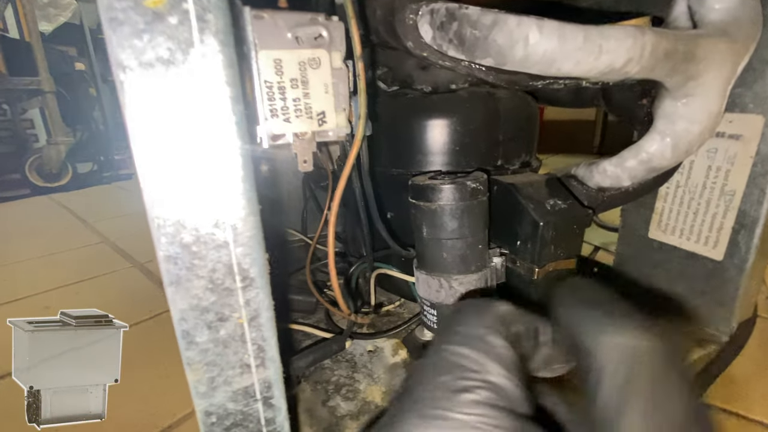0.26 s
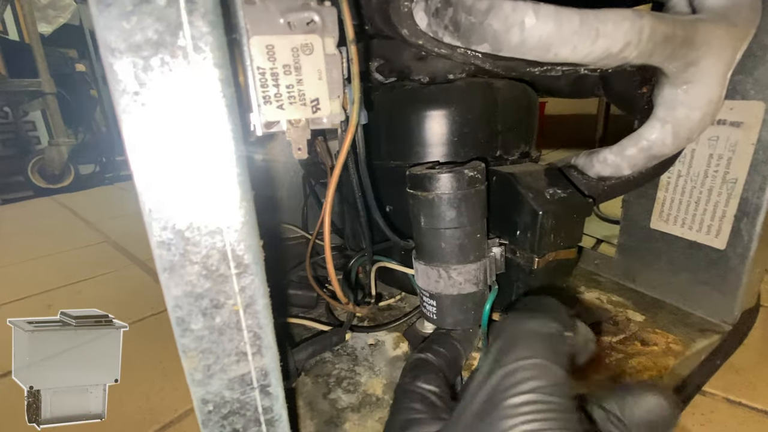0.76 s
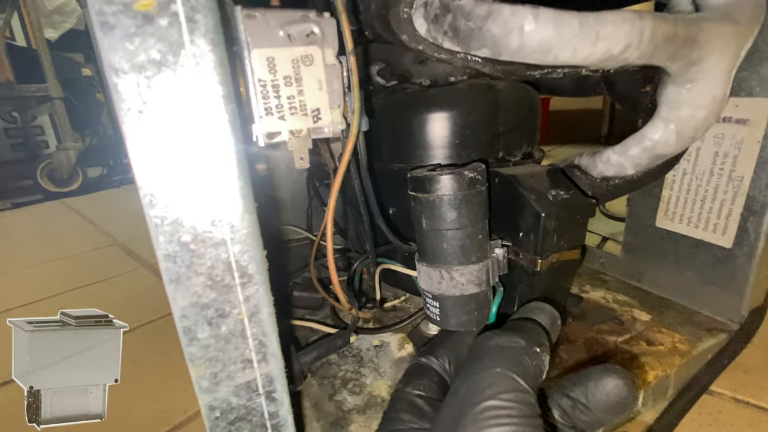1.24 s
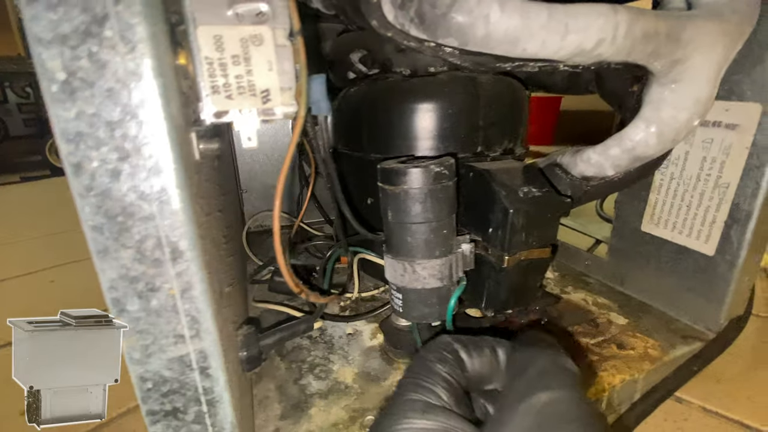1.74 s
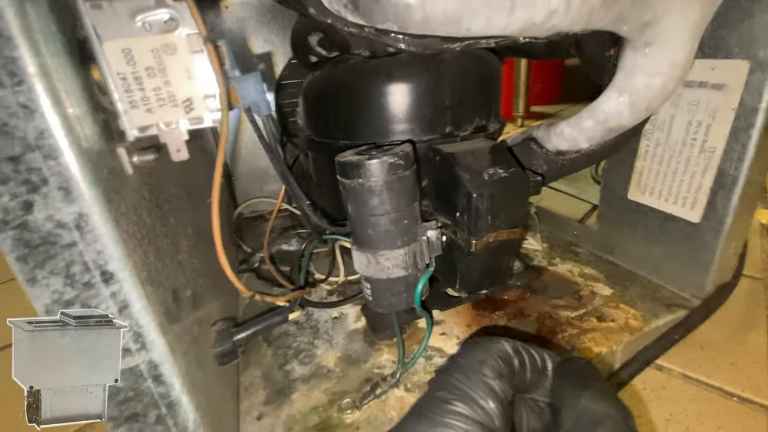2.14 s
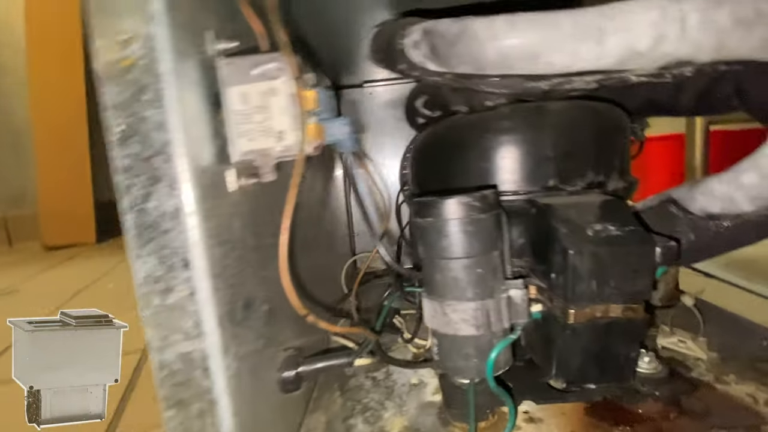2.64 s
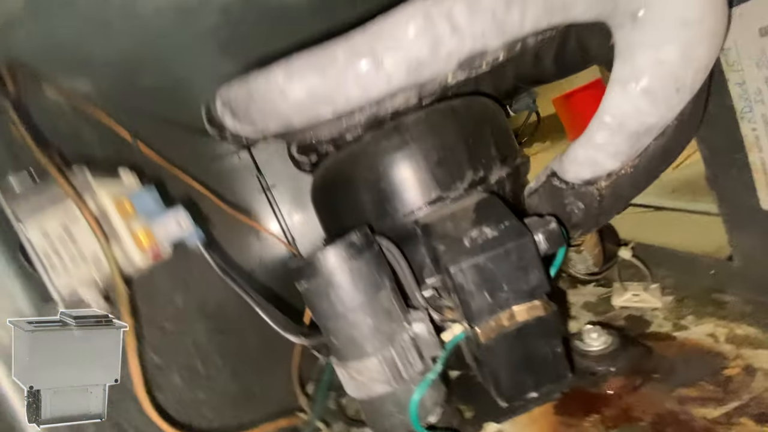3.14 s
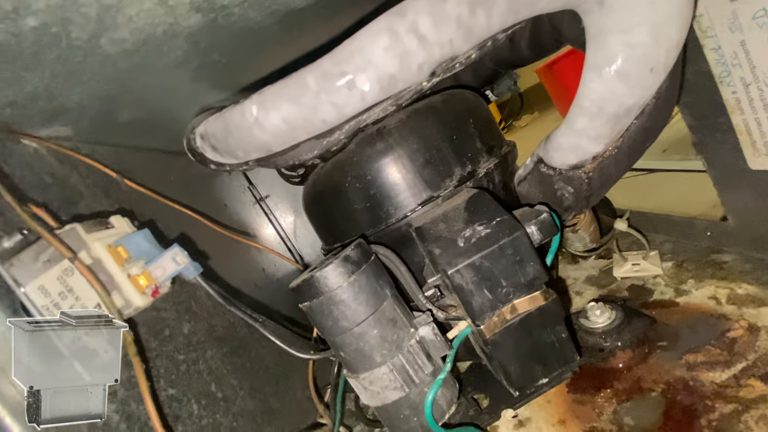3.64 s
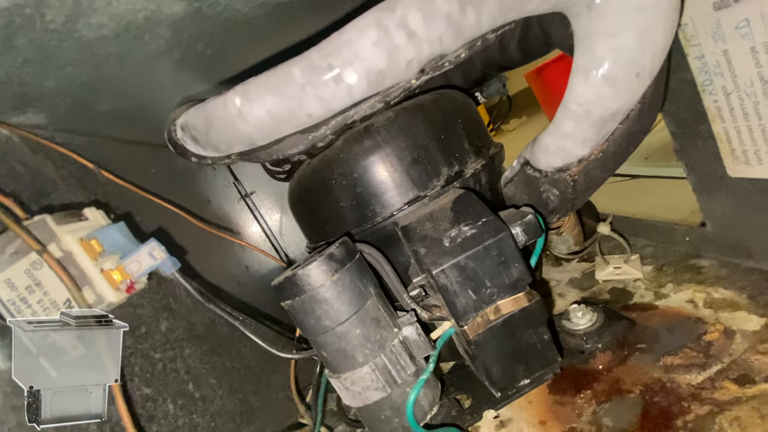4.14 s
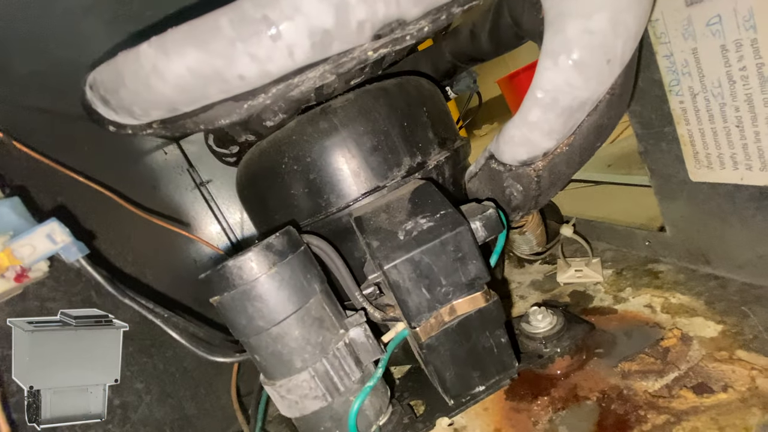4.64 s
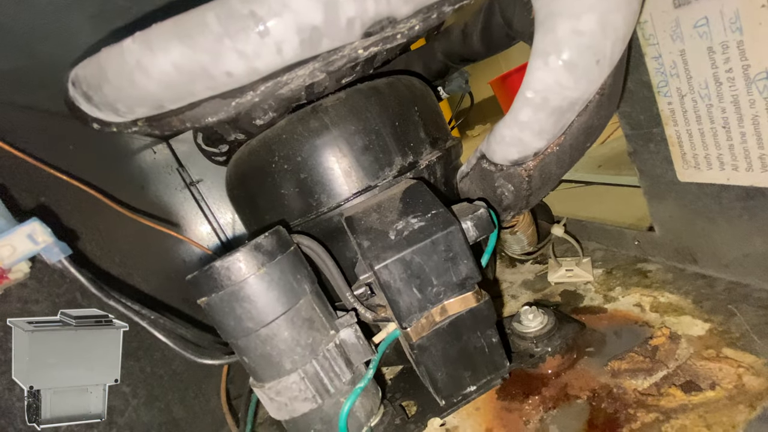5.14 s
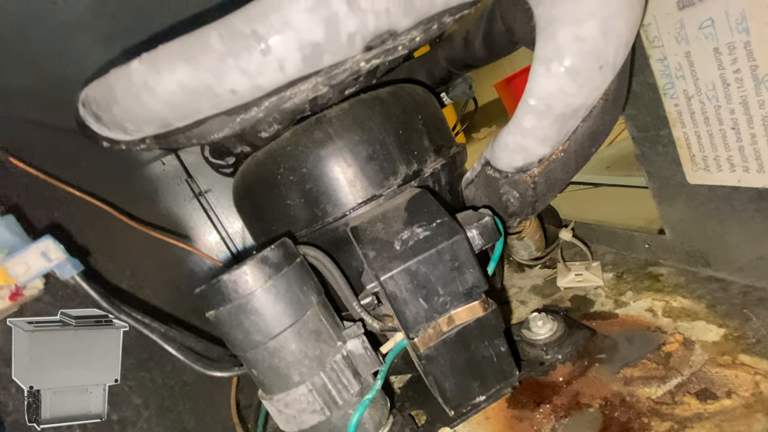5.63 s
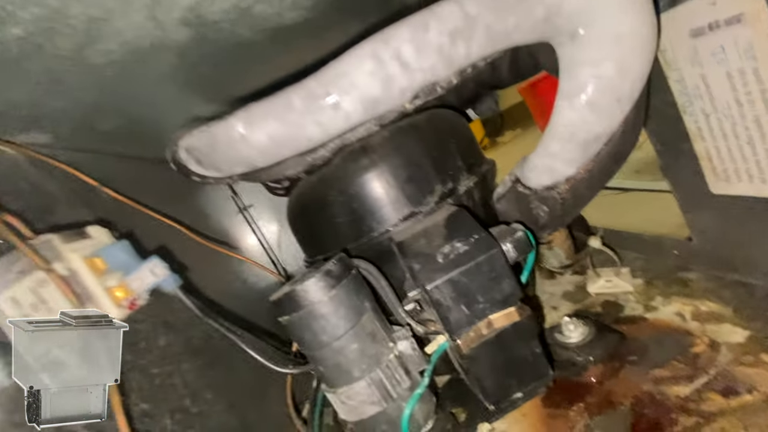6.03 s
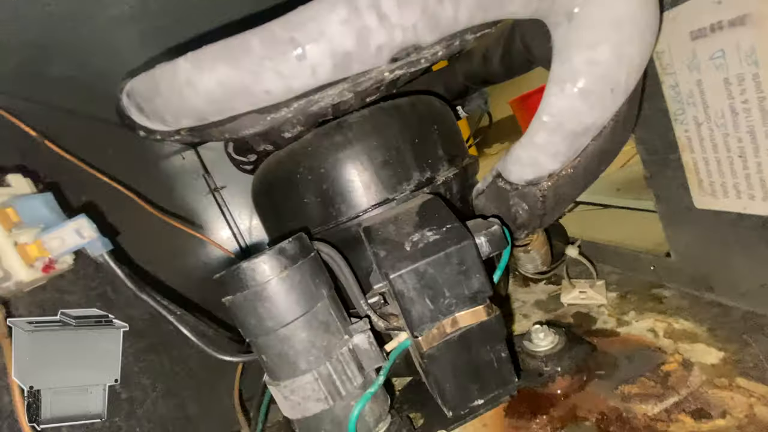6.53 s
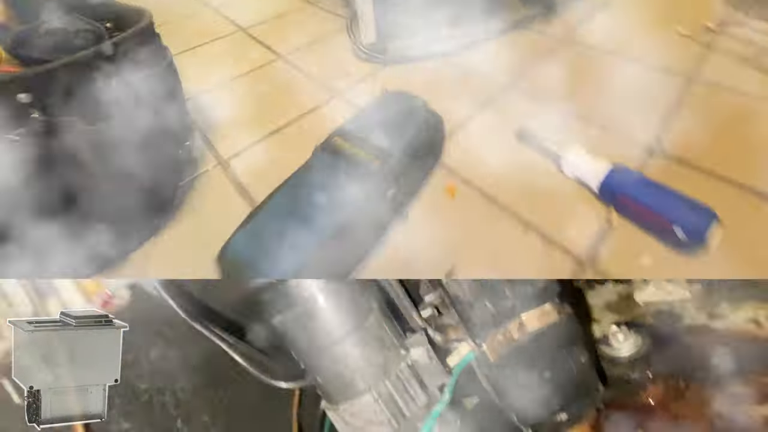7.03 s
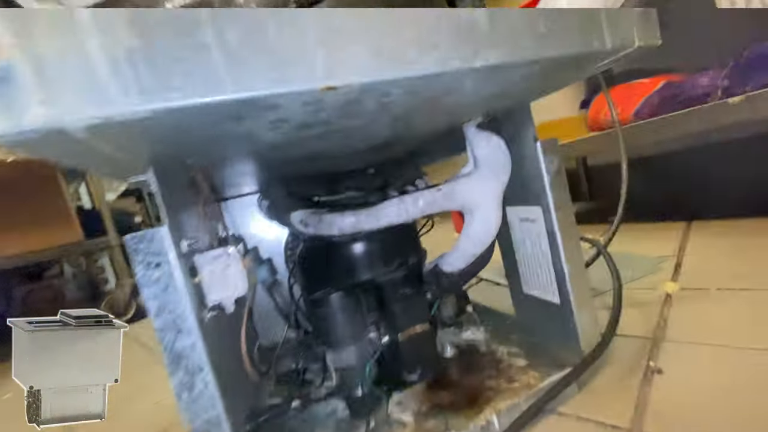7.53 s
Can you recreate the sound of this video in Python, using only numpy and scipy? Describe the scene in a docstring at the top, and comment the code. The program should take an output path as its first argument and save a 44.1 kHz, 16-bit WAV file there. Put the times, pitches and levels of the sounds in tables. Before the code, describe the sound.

A freezer's compressor and fan run without pause, a low hum under rushing air, hiss and thin metallic whine. The handheld microphone moves deep into the sheet-metal bay, making the sound fuller and brighter. Low draught flutters buffet it, mostly on the left. A heavy cluster of blows rings the cabinet, then a tool clacks close by, the microphone is bumped and drawn away, and the machine fades back into a tiled room.

```python
"""Freezer condensing unit, handled phone

A condensing unit runs on a tiled floor, heard at the two ports of a phone held into its sheet-metal bay.
Compressor: shaft and mains harmonics, shell whine, per-turn clatter and gas hiss. Fan: blade harmonics,
coloured noise through bay resonances, a whistle. Draught and eddies buffet the ports, mostly the left.
The noise swells briefly and dully at times. Faint glove rubs come from handling. Heavy blows ring the cabinet
as struck modes and decaying noise; later a tool clacks close by, the phone is bumped and drawn away."""
import sys
import numpy as np
from scipy import signal
from scipy.fft import rfft, irfft
from scipy.io import wavfile
from scipy.ndimage import uniform_filter1d

SR = 44100
rng = np.random.default_rng(int(sys.argv[2]) if len(sys.argv) > 2 else 0)


def write(x):
    x = np.atleast_2d(x).T
    wavfile.write(sys.argv[1], SR, np.round(np.clip(x, -1, 1) * 32767).astype(np.int16))


N = 343098
T = np.arange(N) / SR  # [s]

# Levels and densities are relative within their layer.
# phone depth in the bay: (time [s], depth [0-1])
DEPTH = [(1.2, 0.21), (2.4, 0.34), (2.8, 0.81), (4.3, 0.86), (4.85, 0.98), (6.8, 0.97), (7.5, 0)]
# source levels by place: (bay mouth [dB], gain deep inside [dB], gain once drawn away [dB])
RUSH_LEVEL_DB = (-38.5, 2, -14)
HUM_LEVEL_DB = (-35.5, 2, -15)
HISS_LEVEL_DB = (-56.5, 4.9, 4.1)
LEAVE_S, LEAVE_LENGTH_S = 7.113, 0.5  # one even move away

# right port, facing away from the unit: (frequency [Hz], right minus left [dB])
PORT_SHADE = [(100, -1), (220, -0.5), (400, -3.5), (650, -1.5), (900, -4), (1300, -3.5), (1700, -5),
              (2200, -3), (3000, -8), (4500, -13.5), (6500, -24.5), (8500, -8.5), (10000, 0)]
# likeness of the two ports: (frequency [Hz], likeness [0-1])
PORT_LIKENESS = [(100, 0.8), (250, 0.67), (650, 0.92), (900, 0.7), (2200, 0.24), (4000, 0), (7000, 0),
                 (10000, 0.92)]

SHAFT_HZ, BLADE_HZ, MAINS_HZ = 58.6, 217.7, 59.9
# compressor hum: (multiple of shaft rate, level [dB], right minus left [dB])
SHAFT_LINES = [(1, -8.5, 0)]
# motor iron: (multiple of mains rate, level [dB], right minus left [dB])
MAINS_LINES = [(2, -9, 0.5), (4, -7, 0), (14, -25, -18)]
# harmonics on a shell resonance: (multiple of shaft rate, level [dB], right minus left [dB])
SHELL_LINES = [(51, -1, -12), (52, 0, -14), (53, -3, -14), (59, -6, -12), (93, -11, -15), (94, -11, -15),
               (102, -10, -15), (172, -9, -1), (173, -13, -1), (174, -9, -1)]
# beaming of the shell at the phone: (time [s], level [dB])
WHINE_BEAM = [(1.3, -9), (1.9, -2), (3, -4.5), (4.2, -4), (4.6, -6.5), (7, -4.5), (7.5, -25)]
# narrow beam of one high shell harmonic, caught in passing: (time [s], level [dB])
SQUEAL_BEAM = [(2.9, -14), (3.3, -10), (3.9, -7), (4.3, -2), (4.4, -25), (5.9, -12), (7.5, -18)]
SQUEAL_MULTIPLE = 105  # of shaft rate
# gas hiss and valve spectrum: (frequency [Hz], density [dB per Hz])
HISS_SPECTRUM = [(300, 6.5), (900, 6.5), (2000, 4), (3000, 1.5), (4000, 1), (5300, 2), (7000, -3.5),
                 (9000, -6.5), (12000, -45), (16000, -16)]
# refrigerant-line hiss spectrum: (frequency [Hz], density [dB per Hz])
SIZZLE_SPECTRUM = [(7000, -14.5), (9400, -5), (10100, 5.5), (11500, -0.5), (12400, -1), (13300, -7),
                   (16000, -41)]
BUZZ_DB = -12.5  # part of the line hiss repeating every turn, re the steady part

# fan: (multiple of blade rate, level [dB], right minus left [dB])
BLADE_LINES = [(1, -1, 0.5), (2, -16, 2.5), (3, -15.5, 0.5), (4, -24.5, 5)]
# fan air spectrum: (frequency [Hz], density [dB per Hz])
RUSH_SPECTRUM = [(40, -41), (100, -10.5), (150, -0.5), (190, -4.5), (290, -3.5), (380, -4.5), (500, -4.5),
                 (620, -5.5), (760, -7), (1000, -13.5), (1250, -15), (1500, -22), (2400, -24.5),
                 (5000, -32.5), (16000, -70)]
# bay resonances: (frequency at mouth [Hz], frequency deep inside [Hz], width [Hz],
# left at mouth [dB], right at mouth [dB], left deep inside [dB], right deep inside [dB])
BAY_MODES = [(437, 445, 70, -22, -3.5, -3.5, -9.5), (658.6, 615, 65, -15.5, -9, -0.5, -5),
             (833, 862, 70, -1, -25, -12, -12), (1016, 1070, 130, -2.5, -22, -35, -31),
             (1284, 1310, 130, -21, -23, -12.5, -20), (1780, 1600, 260, -25, -11.5, -9, -15),
             (1970, 2120, 200, -24, -12, -17, -26), (2533, 2800, 300, -21, -10.5, -19, -38)]
# whoosh spectrum as the phone swings into the bay: (frequency [Hz], density [dB per Hz])
WHOOSH_SPECTRUM = [(800, -25), (1050, -5), (1300, 9), (1600, 0), (2000, -34)]
SWING_S, SWING_LENGTH_S, SWING_DB = 2.95, 0.6, -7.5
WHISTLE_HZ, WHISTLE_DB = 1329.5, -17  # level re the rush
WHISTLE_MOUTH_DB = -14  # added on the right port at the bay mouth

# unit's noise returned by the tiled room: (frequency [Hz], density [dB per Hz])
ROOM_SPECTRUM = [(40, -13), (70, 1), (140, 8), (280, -18), (380, -6), (600, 4.5), (760, -18), (1100, -5.5),
                 (1400, -1), (1700, -17.5), (2100, -12.5), (2600, -13.5), (8000, -37)]
ROOM_DB = -46.5

# spells in the fan's air stream: (start [s], end [s], level [dB])
AIRSTREAM = [(0.093, 1.123, -29), (3.104, 7.287, -33)]
SHELTERED_DB, SHELTERED_AWAY_DB = -40.5, -4.5  # draught beside the stream; change once drawn away
STREAM_EDGE_S = 0.1  # time scale of crossing the edge
# draught spectrum: (frequency [Hz], density [dB per Hz])
WIND_SPECTRUM = [(15, -29), (30, -25), (45, 2), (62, 1.5), (100, -1), (150, -0.5), (250, -18.5), (600, -46),
                 (8000, -100)]
# single eddies, mainly at the left port: (time [s], peak [dB], frequency [Hz])
EDDIES = [(0, -24, 70), (0.144, -22, 58.9), (.323, -15.5, 65), (0.471, -20, 78), (.607, -22.5, 159),
          (0.629, -18, 70), (.674, -11.5, 80), (0.737, -22, 125), (0.765, -19, 133), (.965, -26, 130),
          (1.022, -24, 133), (1.067, -20.5, 111), (1.135, -30, 144), (3.826, -17, 65.95),
          (4.029, -19, 64.9), (4.289, -20, 130.4), (4.383, -18.5, 66), (4.465, -20, 80),
          (4.647, -16, 71.14), (4.677, -24, 85), (4.794, -17, 78), (5.36, -19, 60), (6.11, -20, 111),
          (6.24, -21, 90), (6.308, -18, 68), (6.525, -21, 90), (6.574, -14.5, 58.4), (7.159, -24, 60),
          (7.239, -31, 90)]
EDDY_SWELL_S = 0.0082  # envelope rise to peak
PUFF_T60_S, EDDY_PUFF_DB = 0.24, -10  # rough puff with each eddy, re its peak

# brief dull swells of the noise: (time [s], level [dB])
SWELLS = [(.613, -25), (4.311, -24), (4.89, -26)]
# swell spectrum: (frequency [Hz], density [dB per Hz])
SWELL_SPECTRUM = [(120, -10), (350, 5), (750, 3), (1500, -27), (4000, -30), (12000, -55)]

# glove rubs on the phone: (time [s], half-width to 1/e [s], left [dB], right [dB])
RUBS = [(2.22, 0.045, -48, -61), (6.52, .06, -64, -55), (6.863, 0.092, -59, -50)]
# rub spectrum: (frequency [Hz], density [dB per Hz])
GLOVE_SPECTRUM = [(1000, -15), (3000, 3), (7000, -5), (9000, -10), (14000, -30)]

# blows on the cabinet: (time [s], thud [dB], rattle [dB])
BLOWS = [(5.6234, -1.5, 0.5), (5.6293, 0.5, 3.5), (5.6347, 2, 2.5), (5.641, -6.5, 4), (5.6482, -9, 1),
         (5.6548, -4, -5), (5.6587, -14, -14), (5.677, -15, -14), (5.683, -3, -11), (5.71, -15, -15),
         (5.728, -10, -21)]
# cabinet panel modes: (frequency [Hz], level [dB], t60 [s])
PANEL_MODES = [(165.5, 4, 0.066), (226, -28, .25), (365, -9, 0.11), (392, -6.5, 0.11), (587, -31, .3),
               (913, -25, 0.35), (937, -26, .2), (1227, -27, 0.3), (1336, -29, 0.3), (1486, -25, 0.22),
               (1705, -29, 0.31), (1900, -27, .2), (2640, -33, 0.18)]
# dense sheet-metal ring: (frequency [Hz], density [dB per Hz])
SHEET_SPECTRUM = [(50, -14), (110, 2), (170, 6.5), (265, 0.5), (390, 6), (680, -17), (950, -4), (1350, -4),
                  (2000, -10.5), (3000, -12), (4500, -14.5), (6500, -16), (9000, -24.5), (12000, -28),
                  (16000, -54)]
# brief clang of the struck spot: (frequency [Hz], density [dB per Hz])
CLANG_SPECTRUM = [(600, -27), (860, 6), (1000, 5), (1300, -2), (1600, -18), (2400, -34)]
ROCK_S, ROCK_HZ, ROCK_DB, ROCK_T60_S = 5.6525, 66, -10.5, 0.2  # whole cabinet rocks

# tool contacts: (time [s], level [dB])
CLACKS = [(7.081, -7), (7.085, 1.5), (7.087, 3), (7.0885, -11), (7.0935, -16), (7.0978, -19)]
# clack spectrum: (frequency [Hz], density [dB per Hz])
TOOL_SPECTRUM = [(50, -8), (130, -6), (270, -4), (480, 6.5), (650, -7), (780, 4), (930, 3.5), (1100, -8),
                 (1350, -4), (2100, -12), (2850, -5.5), (3500, -11), (4500, -12), (5700, -13),
                 (6700, -15.5), (9000, -22.5), (12000, -24), (16000, -37)]
# tool modes: (frequency [Hz], level [dB], t60 [s])
TOOL_MODES = [(794, -32, .06), (915, -31, 0.055), (1300, -38, .05), (2900, -35, 0.048)]
# bumps on the phone: (time [s], initial frequency [Hz], level [dB], t60 [s])
BUMPS = [(7.081, 75, -12, 0.11), (7.0874, 130, -13, 0.045), (7.1038, 150, -2.5, 0.083)]
BUMP_SAG_S = 0.017  # time in which a bump's pitch halves

TOP_HZ = 15700


def undb(db):
    """Decibels to gain."""
    return 10 ** (np.asarray(db) / 20)


def unit(x):
    """Scale to rms 1."""
    return x / np.sqrt(np.mean(x ** 2))


def curve(points):
    """Interpolate (time, value) points at every sample."""
    s, value = np.transpose(points)
    return np.interp(T, s, value)


def along(points, hz):
    """Interpolate (frequency, value) points on a log-frequency axis."""
    f, value = np.transpose(points)
    return np.interp(np.log(hz + 1), np.log(f), value)


def walk(rate_hz):
    """Smoothed random steps with a spread near 1."""
    k = int(SR / rate_hz)
    held = np.repeat(rng.standard_normal(N // k + 1), k)
    smooth = uniform_filter1d(uniform_filter1d(held, k), k)
    return np.sqrt(2) * smooth[:N]


def noise(spectrum, lag_ms=0, shade=1, alike=1, size=N):
    """Coloured noise at both ports, rms 1 on the left; the right is lagged, shaded and partly independent."""
    hz = np.fft.rfftfreq(size, 1 / SR)
    left, own = rfft(rng.standard_normal((2, size))) * undb(along(spectrum, hz))
    c = np.clip(alike * along(PORT_LIKENESS, hz), 0, 1)
    lag = np.exp(-2j * np.pi * hz * lag_ms / 1000)
    right = c * left * lag + np.sqrt(1 - c ** 2) * own
    pair = irfft([left, right * undb(shade * along(PORT_SHADE, hz))], size)
    return pair / pair[0].std()


def tones(base_hz, lines, waver_db, waver_rate_hz, drift, lag_ms=0.21):
    """Harmonics of one drifting rotation, each wavering in level on its own; also returns the turns."""
    turns = np.cumsum(base_hz * (1 + drift * walk(3))) / SR
    out = 0
    for multiple, db, right_db in lines:
        k = round(multiple)
        phase = 2 * np.pi * (k * turns + rng.random())
        late = 2 * np.pi * k * base_hz * lag_ms / 1000
        pair = np.array([np.sin(phase), undb(right_db) * np.sin(phase - late)])
        level = undb(db + waver_db * walk(waver_rate_hz))
        out = out + np.sqrt(2) * level * pair
    return out, turns


def ring(hz, t60_s):
    """One struck mode: an exponentially decaying sine."""
    return np.sin(2 * np.pi * hz * T) * np.exp(-np.log(1000) * T / t60_s)


def strike(times_s, levels_db, response):
    """Convolve impulses with a response."""
    force = np.zeros(N)
    force[(np.asarray(times_s) * SR).astype(int)] = undb(levels_db)
    return signal.fftconvolve(force, response)[:N]


def dying(times_s, levels_db, t60_s):
    """Decaying envelope: the energies of the events add up and leak away."""
    leak = np.exp(-2 * np.log(1000) * T / t60_s)
    energy = strike(times_s, 2 * np.asarray(levels_db), leak)
    return np.sqrt(np.maximum(energy, 0))


def loudness(law, inside, away):
    """Source level in dB for the phone's place."""
    mouth_db, inside_db, away_db = law
    return mouth_db + inside_db * inside + away_db * away


def clatter(turns, spectrum, size=8192, count=260):
    """Noise repeating every turn: uneven shaft harmonics, different at each port."""
    hz = SHAFT_HZ * np.arange(1, count)
    db = along(spectrum, hz) + 4 * rng.standard_normal((2, len(hz)))
    db[1] += along(PORT_SHADE, hz)
    lines = undb(db) * np.exp(2j * np.pi * rng.random(db.shape))
    one_turn = irfft(np.pad(lines, ((0, 0), (1, 0))), size)  # no DC
    position = (turns * size).astype(int) % size
    return one_turn[:, position] / one_turn[0].std()


def sizzle(rush_db, turns):
    """Refrigerant-line hiss, partly buzzing at shaft rate; its level moves less with place than the fan's."""
    db = -37.5 + 0.48 * rush_db + 0.5 * walk(4)
    hiss = noise(SIZZLE_SPECTRUM, lag_ms=-0.27, shade=0)
    return undb(db) * (hiss + undb(BUZZ_DB) * clatter(turns, SIZZLE_SPECTRUM))


def compressor(hum_db, hiss_db, rush_db, inside):
    """Shaft and mains hum, shell whine, valve clatter, and gas hiss pulsing once a turn."""
    shaft, _ = tones(SHAFT_HZ, SHAFT_LINES, waver_db=3, waver_rate_hz=2.82, drift=0.000066)
    iron, _ = tones(MAINS_HZ, MAINS_LINES, waver_db=1, waver_rate_hz=2.5, drift=0.0001, lag_ms=0.85)
    shell, turns = tones(SHAFT_HZ, SHELL_LINES, waver_db=3, waver_rate_hz=18, drift=0.0002)
    hum = undb(hum_db) * (undb(12 * (inside - 1)) * shaft + iron)

    # two clatter patterns, wandering independently
    valves = 0.36 * sum(walk(2) * clatter(turns, HISS_SPECTRUM) for _ in range(2))
    stroke = 1 + 0.057 * np.cos(2 * np.pi * turns)
    gas = undb(10.5) * stroke * noise(HISS_SPECTRUM, lag_ms=-0.15)

    # broad shell ring around its strongest harmonics
    band = noise([(1500, -70), (2600, -18), (3060, 3), (3450, -2), (3750, -22), (7000, -68)])
    whine = undb(curve(WHINE_BEAM)) * (shell + undb(3) * band)
    squeal_line = [(SQUEAL_MULTIPLE, 0, -15)]
    thin, _ = tones(SHAFT_HZ, squeal_line, waver_db=3, waver_rate_hz=25, drift=0.0005)
    squeal = undb(curve(SQUEAL_BEAM)) * thin

    hissing = undb(hiss_db) * (gas + undb(4.5) * valves + whine + squeal)
    return hum + hissing + sizzle(rush_db, turns)


def bay(inside, lag_ms=0.34):
    """Bay resonances excited by turbulence, shifting with phone depth; a whoosh swells as it swings in."""
    out = 0
    for mouth_hz, deep_hz, width_hz, *levels_db in BAY_MODES:
        hz = mouth_hz + (deep_hz - mouth_hz) * inside
        phase = 2 * np.pi * np.cumsum(hz) / SR
        rate_hz = 1.8 * width_hz
        shared, own = (walk(rate_hz) + 1j * walk(rate_hz) for _ in range(2))
        c = np.clip(along(PORT_LIKENESS, deep_hz), 0, 1)
        lag = np.exp(-2j * np.pi * deep_hz * lag_ms / 1000)
        right = c * shared * lag + np.sqrt(1 - c ** 2) * own
        db = np.outer(levels_db[:2], 1 - inside) + np.outer(levels_db[2:], inside)
        narrowband = (np.array([shared, right]) * np.exp(1j * phase)).real
        out = out + undb(db) * unit(narrowband)
    swell = undb(SWING_DB) * np.exp(-((T - SWING_S) / SWING_LENGTH_S) ** 2)
    return out + swell * noise(WHOOSH_SPECTRUM, lag_ms=lag_ms)


def fan(rush_db, hum_db, inside):
    """Blade tone, turbulent air through condenser and bay, and a thin whistle."""
    blades, _ = tones(BLADE_HZ, BLADE_LINES, waver_db=1, waver_rate_hz=4, drift=0.0008, lag_ms=0.3)
    pure, _ = tones(WHISTLE_HZ, [(1, 0, 0)], waver_db=2, waver_rate_hz=12, drift=0.0003, lag_ms=0.08)
    whistle = undb(WHISTLE_DB + np.outer([0, WHISTLE_MOUTH_DB], 1 - inside)) * pure
    flicker_db = 0.5 * walk(14) + 1.2 * walk(150)
    rush = undb(6 + flicker_db) * noise(RUSH_SPECTRUM, lag_ms=0.41)
    return undb(hum_db) * blades + undb(rush_db) * (rush + bay(inside) + whistle)


def tiled_room():
    """The unit's noise returned by the room: steady coloured noise."""
    return undb(ROOM_DB) * noise(ROOM_SPECTRUM, shade=0.21, alike=0.63)


def eddy(start_s, hz):
    """Pressure swings under an envelope that swells and dies."""
    age = np.maximum(T - start_s, 0)
    swell = age / EDDY_SWELL_S * np.exp(1 - age / EDDY_SWELL_S)
    return np.sin(2 * np.pi * hz * age) * swell


def stream_edge(s):
    """Smooth 0-to-1 crossing of the air stream's edge."""
    return (1 + np.tanh((T - s) / STREAM_EDGE_S)) / 2


def draught(away):
    """Air fluttering over the ports: harder in the fan's stream, and in a puff with each eddy."""
    stream_power = sum(
        undb(db) ** 2 * stream_edge(start) * (1 - stream_edge(end)) for start, end, db in AIRSTREAM)
    sheltered = undb(SHELTERED_DB + SHELTERED_AWAY_DB * away)
    times_s, peaks_db, _ = np.transpose(EDDIES)
    puffs = uniform_filter1d(dying(times_s, peaks_db + EDDY_PUFF_DB, PUFF_T60_S), size=600)
    strength = np.sqrt(stream_power + sheltered ** 2 + puffs ** 2)
    gust_db = 1.8 * walk(16)
    flutter = strength * undb(gust_db) * noise(WIND_SPECTRUM, shade=1.5, alike=0.22)
    eddies = sum(undb(peak_db) * eddy(s, hz) for s, peak_db, hz in EDDIES)
    return flutter + np.outer([1.3, 0.2], eddies)  # left, right


def swells():
    """Brief dull swells of the noise: coloured noise under decaying envelopes."""
    s, db = np.transpose(SWELLS)
    return dying(s, db, t60_s=0.04) * noise(SWELL_SPECTRUM, lag_ms=0.2)


def glove():
    """Faint swishes of the grip shifting: noise under Gaussian envelopes."""
    envelope = 0
    for s, length_s, left_db, right_db in RUBS:
        rub = np.exp(-((T - s) / length_s) ** 2)
        envelope = envelope + np.outer(undb([left_db, right_db]), rub)
    return envelope * undb(2 * walk(82)) * noise(GLOVE_SPECTRUM, shade=0, alike=0.3)


def cabinet_knock():
    """Blows ring the panels and rattle the sheet metal; the tiled room answers, duller and longer."""
    s, thud_db, rattle_db = np.transpose(BLOWS)
    modes = sum(undb(db) * ring(hz, t60_s) for hz, db, t60_s in PANEL_MODES)
    thud = undb(-14) * strike(s, thud_db, modes)
    sheet = noise(SHEET_SPECTRUM, lag_ms=0.177, shade=0.98)
    rattle = undb(-22.5 + 2 * walk(350)) * dying(s, rattle_db, t60_s=0.27) * sheet
    dull = [(hz, db - 3 * np.log2(1 + hz / 2500)) for hz, db in SHEET_SPECTRUM]
    room = undb(-22.5 + 2 * walk(120)) * dying(s, rattle_db, t60_s=0.49) * noise(dull, alike=0.16)
    clang = undb(-20.5) * dying(s, thud_db, t60_s=0.11) * noise(CLANG_SPECTRUM, lag_ms=0.33)
    rock = strike([ROCK_S], [ROCK_DB], ring(ROCK_HZ, ROCK_T60_S))
    return np.outer([1, 0.9], thud + rock) + clang + rattle + room


def bump(start_s, hz, t60_s):
    """A soft thump whose pitch sags as the contact relaxes."""
    age = np.maximum(T - start_s, 0)
    cycles = hz * BUMP_SAG_S * np.log1p(age / BUMP_SAG_S)
    return np.sin(2 * np.pi * cycles) * np.exp(-np.log(1000) * age / t60_s)


def tool_knock():
    """A dry, ringing clatter at the phone with its room tail, and soft bumps through the case."""
    s, db = np.transpose(CLACKS)
    clack = undb(-15) * dying(s, db, t60_s=0.057) * noise(TOOL_SPECTRUM, shade=0.1, alike=0.23)
    hardest = db.argmax()
    modes = sum(undb(mode_db) * ring(hz, t60_s) for hz, mode_db, t60_s in TOOL_MODES)
    ringing = strike([s[hardest]], [db[hardest]], modes)
    room = undb(-44.5) * dying(s, db, t60_s=0.5) * noise(TOOL_SPECTRUM, shade=0.2, alike=0.47)
    thumps = sum(undb(bump_db) * bump(start_s, hz, t60_s) for start_s, hz, bump_db, t60_s in BUMPS)
    return clack + ringing + room + thumps


def scene():
    """The running unit, swells of the noise, the handling of the phone and the two knocks."""
    inside = np.clip(curve(DEPTH), 0, 1)
    away = np.clip((T - LEAVE_S) / LEAVE_LENGTH_S, 0, 1)
    rush_db = loudness(RUSH_LEVEL_DB, inside, away)
    hum_db = loudness(HUM_LEVEL_DB, inside, away)
    hiss_db = loudness(HISS_LEVEL_DB, inside, away)
    machine = compressor(hum_db, hiss_db, rush_db, inside) + fan(rush_db, hum_db, inside)
    air = draught(away) + swells()
    knocks = cabinet_knock() + tool_knock()
    return machine + tiled_room() + air + glove() + knocks


def record(dry):
    """The phone drops the deepest bass, rounds the loudest peaks and cuts the top."""
    bass_cut = signal.butter(1, 12, "high", fs=SR, output="sos")
    dry = signal.sosfilt(bass_cut, dry)
    rounded = dry / (1 + dry ** 4) ** (1 / 4)
    top_cut = signal.ellip(8, 0.2, 80, TOP_HZ, fs=SR, output="sos")
    return signal.sosfilt(top_cut, rounded)


dry = scene()
out = record(dry)
write(out)
```